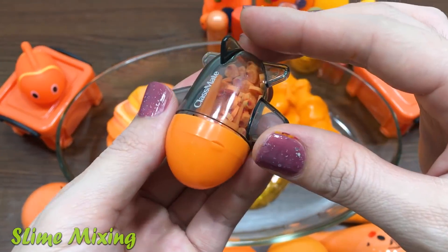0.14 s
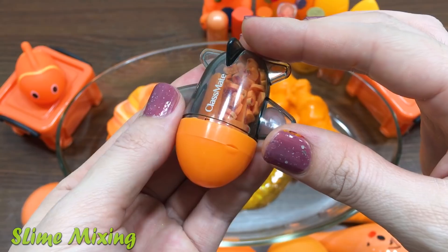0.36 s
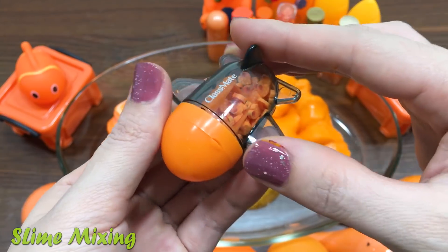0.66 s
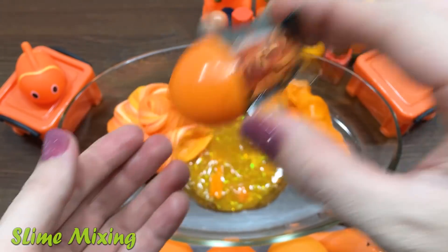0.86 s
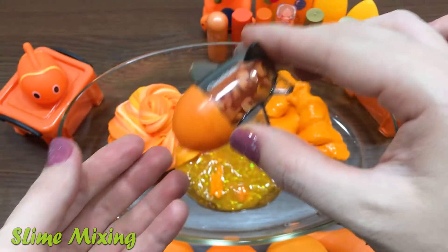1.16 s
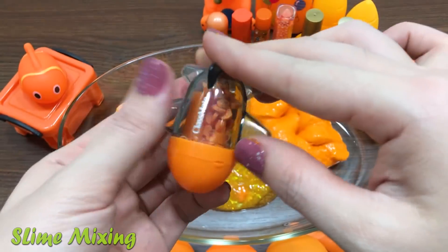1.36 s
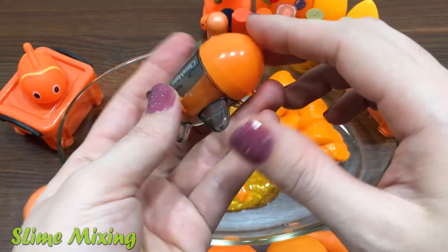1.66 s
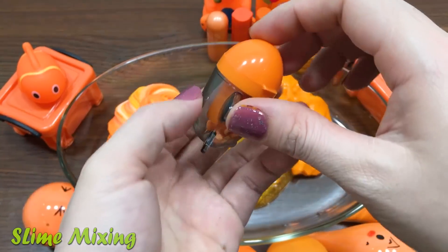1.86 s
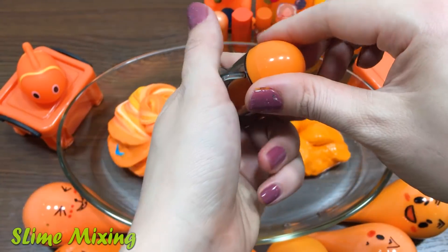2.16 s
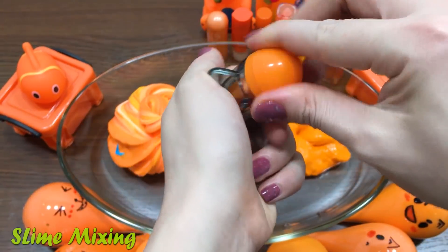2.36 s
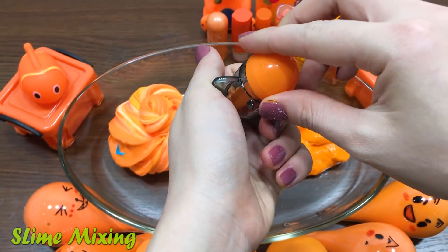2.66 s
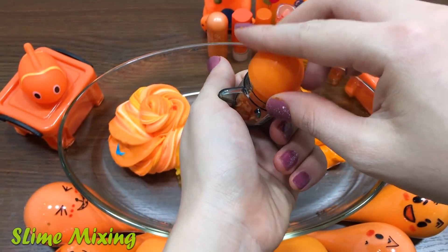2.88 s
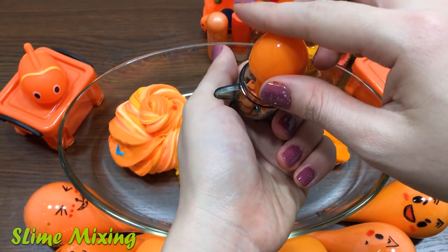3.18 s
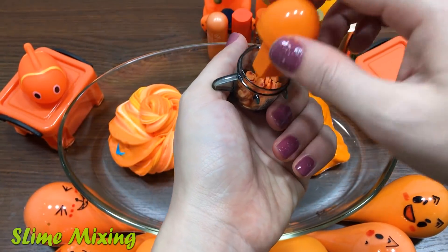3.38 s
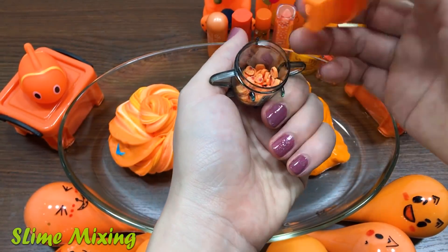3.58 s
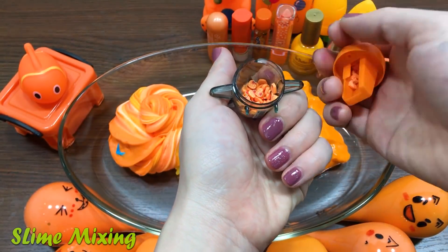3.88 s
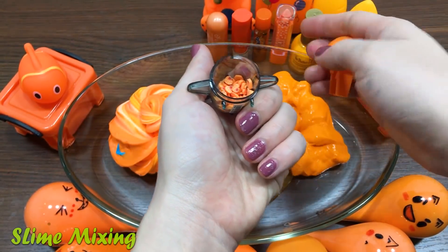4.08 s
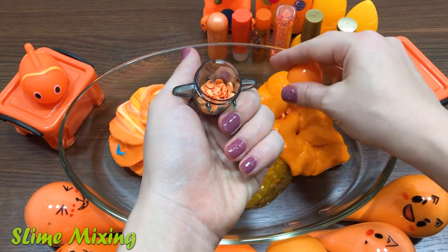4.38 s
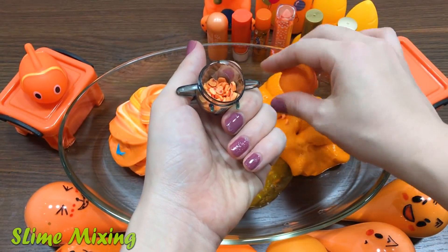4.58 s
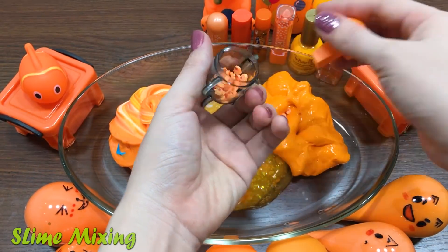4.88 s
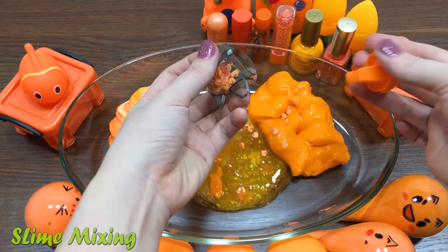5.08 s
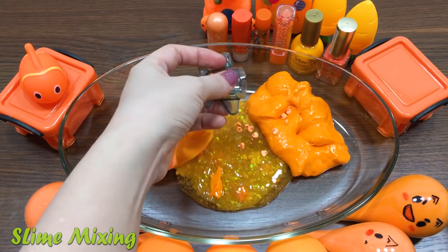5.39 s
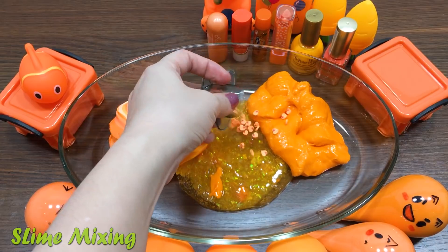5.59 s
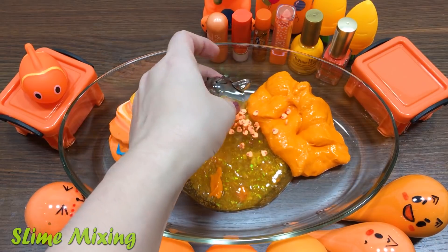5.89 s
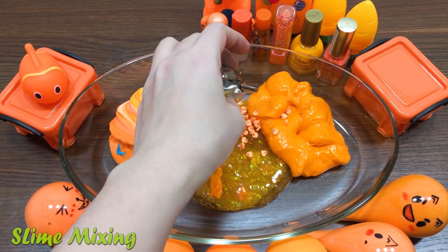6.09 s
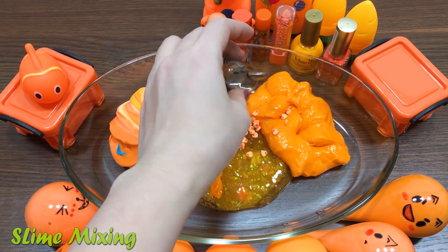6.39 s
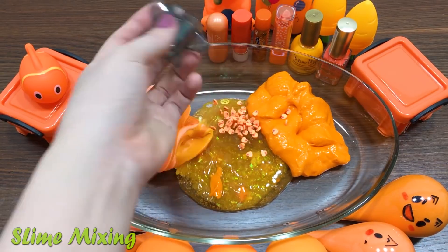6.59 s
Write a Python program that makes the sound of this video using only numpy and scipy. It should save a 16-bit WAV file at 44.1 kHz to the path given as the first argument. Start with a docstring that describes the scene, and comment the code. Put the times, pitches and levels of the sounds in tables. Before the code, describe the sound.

Very close in a quiet room, fingers faintly rub a small plastic capsule, then shake it in four quick, bright bursts of rattling pieces. Nails click on the shell, the cap pops off with a sharp snap, and hollow knocks ring the open cup. The loose cap clicks lightly in the fingers and is put down. Finally, tiny pieces slide out in sparse, faint ticks, landing silently.

```python
"""Shaking and opening a small toy capsule

Close up in a quiet room, a plastic capsule is shaken four times: swarms of contacts ring its shell as pieces rattle.
Fingers rub and click on it; the cap snaps off, and short noisy forces ring the cup and then the loose cap.
The pieces slide out of the cup in sparse clicks and flurries, onto soft slime that adds no sound.
Soft bumps are damped sines; a brief dull noise band, a noise-band tail, filtered air, hum and a thin whine complete it."""
import sys
import numpy as np
from scipy import signal
from scipy.fft import rfft, irfft
from scipy.io import wavfile

SR = 44100
rng = np.random.default_rng(int(sys.argv[2]) if len(sys.argv) > 2 else 0)


def store_pcm(level_fs):
    """Save levels as 16-bit WAV."""
    pcm = np.round(np.clip(level_fs, -1, 1) * 32767).astype(np.int16)
    wavfile.write(sys.argv[1], SR, np.atleast_2d(pcm).T)


N = 297353
TIME = np.arange(N) / SR
CUTOFF_HZ = 15800

# resonances of the closed capsule: (frequency [Hz], width [Hz], level [dB])
SHELL_MODES = [(1800, 170, -15), (2570, 340, -7.5), (3100, 550, -14.5), (4580, 850, -4), (5640, 780, -6.5),
               (7040, 830, -2), (8500, 470, -3.5), (9190, 410, -1.5), (10880, 1300, -4), (12140, 1200, -2),
               (14550, 1400, -3.5), (15700, 700, -1)]


def from_db(db):
    """Decibels to gain."""
    return 10 ** (np.asarray(db) / 20)


def rms_one(x):
    """Scale to rms 1."""
    return x / np.sqrt(np.mean(x ** 2) + 1e-20)


def add(out, s, sound):
    """Mix a short sound in at time s."""
    at = round(s * SR)
    sound, at = sound[max(-at, 0):], max(at, 0)
    out[at:at + len(sound)] += sound[:N - at]


def cut(x, hz, kind, order=2):
    """Butterworth filter."""
    sos = signal.butter(order, np.clip(hz, 10, .48 * SR), kind, fs=SR, output="sos")
    return signal.sosfilt(sos, x)


def two_poles(hz, width_hz):
    """Pole radius and denominator of a damped mode."""
    r = np.exp(-np.pi * width_hz / SR)
    return r, [1, -2 * r * np.cos(2 * np.pi * hz / SR), r * r]


def resonance(x, hz, width_hz):
    """Two-pole resonance with gain 1 on top."""
    r, poles = two_poles(hz, width_hz)
    zeros = np.array([1, 0, -1]) * (1 - r * r) / 2
    return signal.lfilter(zeros, poles, x + 1e-18)


def disperse(x, hz=6000, width_hz=5000, count=1):
    """Bending waves reach the edge of a thin wall at different times: an all-pass smears a sharp front."""
    _, poles = two_poles(hz, width_hz)
    for _ in range(count):
        x = signal.lfilter(poles[::-1], poles, x)
    return x


def swell_at(at_s, spread_s):
    """A slow bell-shaped rise and fall, 0 to 1."""
    return np.exp(-((TIME - at_s) / spread_s) ** 2 / 2)


def hollow(x, s, width_hz):
    """The air resonance of the hollow at time s, higher the less the cap and the fingers cover it."""
    # air resonance: (time [s], frequency [Hz])
    hollow_pitch = [(1.5, 2700), (1.9, 4200), (2.25, 4100), (2.367, 2130), (2.556, 3740), (2.6, 2400),
                    (2.72, 2400), (2.97, 3080), (3.15, 2550), (3.26, 2990), (3.7, 3050), (3.86, 4400),
                    (3.95, 3260), (5.2, 3770), (6.1, 2300)]
    return resonance(x, np.interp(s, *np.transpose(hollow_pitch)), width_hz)


def plastic(force, modes, spread_db):
    """A thin plastic wall: each place of contact drives its modes with other strengths."""
    strengths = from_db(rng.normal(0, spread_db, len(modes)))
    ring = 0
    for k, (hz, width_hz, db) in enumerate(modes):
        gain = (-1) ** k * strengths[k] * from_db(db)
        ring = ring + gain * resonance(force, hz, width_hz)
    return ring


def at_click_level(x, db):
    """Give a click the energy of 4 ms at this level."""
    return x * from_db(db) * np.sqrt(.004 * SR / (np.sum(x ** 2) + 1e-20))


def clicks(rows, modes, tick_hz, rough, slip_s, crack_db, hollow_db, hollow_width_hz,
           octaves_per_db=.018, colour_db=1.5, firm_db=-40, skid_power=.34):
    """A sharp release and a skid, longer for firm knocks: the hollow body rings low, the wall ticks high."""
    split_hz = 4500
    out, t = np.zeros(N), TIME[:SR // 40]
    for s, body_db, tick_db in rows:
        skid_s = slip_s * from_db(skid_power * (max(body_db, tick_db) - firm_db))
        skid = rough * rng.standard_normal(len(t)) * np.exp(-t / skid_s)
        force = cut(skid, 4200, "high")
        force[0] += 1  # release

        crack = from_db(crack_db) * cut(force, 900, "high", order=1)
        ring = plastic(force, modes, colour_db) + crack

        low = cut(ring, split_hz, "low", order=4)
        body = hollow(low, s, 3900) + from_db(hollow_db) * hollow(low, s, hollow_width_hz)

        # the more the tick outweighs the body, the higher it lies
        centre_hz = min(tick_hz * 2 ** (octaves_per_db * (tick_db - body_db)), CUTOFF_HZ)
        tick = resonance(cut(ring, split_hz, "high", order=4), centre_hz, 5400)

        add(out, s, disperse(at_click_level(body, body_db) + at_click_level(tick, tick_db)))
    return out


def fidget(from_s, to_s, per_s, body_db, tick_db, spread_db=2.5):
    """Faint contacts at loosely spaced moments: rows of (time [s], body [dB], tick [dB])."""
    count = max(round((to_s - from_s) * per_s), 1)
    times = from_s + (to_s - from_s) * (np.arange(count) + rng.random(count)) / count
    return [(s, *rng.normal([body_db, tick_db], spread_db)) for s in times]


def flurries(rows, modes, per_s, uneven_db, crack_db, hollow_db, bright_hz, edge, count=6):
    """Swarms of tiny uneven contacts swell and fade around a moment; each place has its own colour."""
    out = np.zeros(N)
    for s, db, spread_s in rows:
        reach = int(SR * min(4 * spread_s + .01, .3))
        t = np.arange(-reach, reach) / SR
        swell = np.exp(-np.abs(t / spread_s) ** edge / 2)
        sound = 0
        for _ in range(count):  # places of contact
            sizes = from_db(uneven_db * np.minimum(rng.exponential(1, len(t)), 3))
            sizes = sizes * rng.choice([-1, 1], len(t))
            struck = rng.random(len(t)) < per_s / count / SR
            force = sizes * struck * swell
            crack = from_db(crack_db) * cut(force, 1100, "high", order=1)
            grains = plastic(force, modes, spread_db=3.0) + crack
            sound = sound + cut(grains, bright_hz * 2 ** rng.normal(0, .288), "low")
        sound = sound + from_db(hollow_db) * hollow(sound, s, 700)
        sound = from_db(db) * rms_one(sound) * np.sqrt(np.mean(swell ** 2))
        add(out, s + t[0], sound)
    return out


def background():
    """Still air as shaped noise with a swelling rumble; narrow noise bands hum and a sine whines."""
    # still air, spectrum shape: (frequency [Hz], relative level per Hz [dB])
    air_shape = [(15, -55.5), (25, -25), (50, -6.5), (127, -5), (141, -3.5), (157, -15), (185, -9),
                 (309, -15), (624, -22), (796, -23), (887, -25.5), (2160, -29.5), (6210, -33.5),
                 (7920, -32.5), (16000, -38.5)]
    # distant appliance: (frequency [Hz], level relative to the hum [dB])
    hum_lines = [(130.2, -4), (69.8, -6)]
    air_db, hum_db, whine_db = -65, -70.5, -85.5
    whine_hz, waver_hz, rumble_hz = 786, 6.3, 130

    hz, db = np.transpose(air_shape)
    bins_hz = np.maximum(np.fft.rfftfreq(N, 1 / SR), 1)
    shape = from_db(np.interp(np.log(bins_hz), np.log(hz), db))
    air = rms_one(irfft(rfft(rng.standard_normal(N)) * shape, N))
    rumble_db = -3.5 + 6 * swell_at(3.9, spread_s=.8)  # relative to still air
    air = air + cut(air, rumble_hz, "low", order=1) * (from_db(rumble_db) - 1)

    hum = 0
    for line_hz, line_db in hum_lines:
        line = resonance(rng.standard_normal(N + SR), line_hz, waver_hz)[SR:]  # drop the onset
        hum = hum + from_db(line_db) * rms_one(line)
    hum = hum * from_db(hum_db + 8 * swell_at(5.6, spread_s=.45))

    whine = from_db(whine_db) * np.sqrt(2) * np.sin(2 * np.pi * whine_hz * TIME)
    return cut(from_db(air_db) * air + hum + whine, 43, "high", order=3)


def closed_capsule():
    """Fingers rub the closed shell; nails and single pieces click on it and ring its modes."""
    # finger rubs: (time [s], level [dB], spread [s])
    shell_rubs = [(.05, -68.5, 0.05), (.28, -70, 0.016), (.75, -75, 0.05), (1.54, -59.5, 0.04),
                  (1.872, -51, 0.012), (1.95, -60.5, 0.045), (2.22, -55, 0.02), (2.28, -56.5, 0.018)]
    # nails and single pieces: (time [s], body [dB], tick [dB])
    shell_clicks = [(0.2782, -59, -58), (0.7636, -67, -68), (0.8931, -67.5, -66), (1.0356, -62, -58),
                    (1.0539, -62, -37), (1.0685, -52, -32.5), (1.169, -44, -32), (1.4315, -63, -44),
                    (1.4777, -49, -42), (1.7098, -58.5, -51.5), (1.7205, -55, -49), (1.8311, -65, -49),
                    (1.8448, -66, -46.5), (1.8701, -46.5, -38), (1.9037, -68, -48), (1.9882, -57, -50),
                    (2.0439, -53.5, -40.5), (2.102, -66, -49.5), (2.2044, -53, -45), (2.2401, -52, -43.5),
                    (2.2726, -58, -55)]
    stray = fidget(2.14, 2.34, per_s=25, body_db=-62, tick_db=-59)
    rubbing = flurries(shell_rubs, SHELL_MODES, per_s=600, uneven_db=5.0, crack_db=-12,
                       hollow_db=-11, bright_hz=12000, edge=1.6)
    clicking = clicks(shell_clicks + stray, SHELL_MODES, tick_hz=7900, rough=.15, slip_s=.0016,
                      crack_db=-17, hollow_db=-21, hollow_width_hz=1500)
    return rubbing + clicking


def shaking():
    """Pieces brush the near wall, then land on the far one, where one hits hardest and rebounds."""
    # strokes as the heap lands, the last only settling it: (time [s], level [dB])
    strokes = [(1.091, -30.7), (1.201, -30.7), (1.2935, -30.3), (1.3805, -32.3), (1.463, -44)]
    brush_lead_s, rebound_s = .029, .0115
    brushes = [(s - brush_lead_s, db - 5.5, .0082) for s, db in strokes]
    landings = [(s, db, .0068) for s, db in strokes]
    rattle = flurries(brushes + landings, SHELL_MODES, per_s=2200, uneven_db=2.0, crack_db=-14,
                      hollow_db=-14, bright_hz=17900, edge=2.6)

    hits = strokes + [(s + rebound_s, db - 12) for s, db in strokes]
    hardest = [(s, db - 12.5, db + 5.5) for s, db in hits]  # body, tick
    return rattle + clicks(hardest, SHELL_MODES, tick_hz=7900, rough=.1, slip_s=.001,
                           crack_db=-15, hollow_db=-21, hollow_width_hz=1500)


def low_mid_noise(level_db=-65, low_hz=180, high_hz=450):
    """A dull low-mid noise band fades in, holds and fades out, from 1.2 to 1.63 s."""
    band = cut(cut(rng.standard_normal(N), low_hz, "high"), high_hz, "low")
    fade = np.interp(TIME, [1.195, 1.25, 1.6, 1.63], [0, 1, 1, 0])
    return from_db(level_db) * rms_one(band) * fade


def open_cup():
    """Knocks ring the cup and its air; its rim grazes the cap or a finger in flurries."""
    # resonances of the cup: (frequency [Hz], width [Hz], level [dB])
    cup_modes = [(1350, 640, -7), (2086, 250, 3.5), (2400, 430, -1), (3074, 225, 0.5), (4070, 300, -10),
                 (5150, 1000, 0), (8150, 880, -12.5), (8050, 570, -17), (12100, 200, -7),
                 (12000, 1100, -22), (14450, 520, -12)]
    # knocks: (time [s], body [dB], tick [dB])
    cup_clicks = [(2.3671, -50, -54), (2.518, -54, -69), (2.6181, -34, -53), (2.6492, -31.5, -40),
                  (2.6724, -51, -37.5), (2.8983, -51, -63), (2.9713, -38, -40), (3.0169, -48.5, -62),
                  (3.0285, -46.5, -51), (3.1458, -42, -53), (3.2549, -33, -41.5), (3.2829, -42, -58),
                  (3.3636, -50.5, -54.5), (3.5055, -45.5, -53)]
    # rim grazes: (time [s], level [dB], spread [s])
    rim_rubs = [(2.551, -45.5, 0.0059), (2.562, -40, 0.0032), (2.708, -47.5, 0.0065), (2.93, -57.5, 0.013),
                (3.156, -53, 0.003), (3.21, -65, 0.025), (3.42, -59.5, 0.007), (6.11, -66, 0.033)]
    stray = fidget(2.68, 2.77, per_s=30, body_db=-52, tick_db=-58)
    knocks = clicks(cup_clicks + stray, cup_modes, tick_hz=9000, octaves_per_db=.015, rough=.46,
                    slip_s=.001, crack_db=-10.5, hollow_db=8.5, hollow_width_hz=530)
    grazes = flurries(rim_rubs, cup_modes, per_s=1300, uneven_db=6.5, crack_db=-9.5,
                      hollow_db=1.5, bright_hz=13000, edge=1.2)
    return knocks + grazes


def bumps():
    """Plastic gives way or touches down: a few cycles of a low, heavily damped mode."""
    # dull bumps: (time [s], amplitude before decay [dB], frequency [Hz], t60 [s])
    dull_bumps = [(2.542, -32.5, 1010, 0.005), (2.5425, -41.5, 340, 0.028), (2.555, -31.5, 1140, 0.015),
                  (2.5555, -40, 410, 0.0144), (4.478, -43, 720, 0.013)]
    out, t = np.zeros(N), TIME[:SR // 10]
    for s, db, hz, t60_s in dull_bumps:
        decay = np.exp(-np.log(1000) * t / t60_s)
        add(out, s, from_db(db) * np.sin(2 * np.pi * hz * t) * decay)
    return out


def cap_snap():
    """The cap's rim jumps over its catch and rebounds, ringing the capsule as it springs apart."""
    # resonances while springing apart: (frequency [Hz], width [Hz], level [dB])
    seam_modes = [(1150, 240, -11), (2220, 670, -0.5), (3260, 870, -9.5), (4150, 340, 3.5),
                  (5770, 1000, -4), (8300, 1500, -4), (11900, 1600, -8.5), (15200, 2500, -0.5)]
    # jump and rebounds: (time [s], body [dB], tick [dB])
    snap_clicks = [(2.5528, -38.5, -57), (2.5546, -24, -33.5), (2.5564, -44, -25), (2.5599, -41.5, -34)]
    return clicks(snap_clicks, seam_modes, tick_hz=6700, octaves_per_db=.035, rough=.22,
                  slip_s=.00045, crack_db=-17.5, hollow_db=-14.5, hollow_width_hz=1300)


def loose_cap():
    """The cap, turned in the fingers and put aside, rings with clicks and finger rubs."""
    # resonances of the cap: (frequency [Hz], width [Hz], level [dB])
    cap_modes = [(2100, 650, -21), (2810, 170, 2.5), (3110, 190, -2.5), (3450, 160, 2), (4020, 360, -1),
                 (4440, 400, 0), (5230, 740, -8), (7000, 960, -3.5), (8600, 810, -31), (10270, 330, -2),
                 (11600, 1200, -17), (14700, 1100, -12)]
    # contacts: (time [s], body [dB], tick [dB])
    cap_clicks = [(3.7077, -53, -53), (3.754, -54.5, -54), (3.7742, -56.5, -54.5), (3.8519, -47, -54),
                  (3.8578, -46, -50), (3.8874, -49, -50), (3.8965, -42, -45), (3.9044, -44, -46),
                  (3.9162, -50, -47), (3.9445, -47, -57), (3.9897, -68, -55), (4.1332, -52.5, -53),
                  (4.1687, -57, -59), (4.2854, -49, -49.5), (4.3487, -48.5, -46.5), (4.4118, -50.5, -53),
                  (4.4425, -51.5, -60), (4.4582, -63, -48.5), (4.4871, -51, -40), (4.4892, -37, -45),
                  (4.4932, -40.5, -54), (4.6327, -50, -47), (4.719, -58.5, -64), (4.8131, -58, -63)]
    # finger rubs: (time [s], level [dB], spread [s])
    cap_rubs = [(3.70, -58, 0.0061), (3.915, -61, 0.03), (4.28, -62.5, 0.018), (4.45, -58, 0.03),
                (4.52, -52.5, 0.018), (4.60, -58.5, 0.051), (4.82, -62, 0.028)]
    stray = fidget(3.808, 3.848, per_s=75, body_db=-55.5, tick_db=-59)
    clicking = clicks(cap_clicks + stray, cap_modes, tick_hz=7600, octaves_per_db=.04, rough=.15,
                      slip_s=.0011, crack_db=-9.5, hollow_db=-3, hollow_width_hz=700)
    rubbing = flurries(cap_rubs, cap_modes, per_s=380, uneven_db=.5, crack_db=-10.5,
                       hollow_db=-6, bright_hz=12200, edge=1.15)
    return clicking + rubbing


def pouring():
    """Pieces hit the wall of the tilted cup and slide out in sparse flurries."""
    # resonances: (frequency [Hz], width [Hz], level [dB])
    piece_modes = [(2020, 1400, -15.5), (2620, 120, -0.5), (3140, 220, -9.5), (5700, 320, 3.5),
                   (6900, 700, -6), (8200, 1060, 0.5), (10300, 360, -15), (10860, 470, -2.5),
                   (11930, 280, 0.5), (12900, 300, 5), (14100, 570, -7)]
    # wall hits: (time [s], body [dB], tick [dB])
    piece_clicks = [(5.197, -57.5, -73), (5.2073, -59.5, -66), (5.2493, -60, -73), (5.3175, -57.5, -60),
                    (5.3893, -66, -56.5), (5.4373, -53.5, -75), (5.5232, -60, -45), (5.5839, -67, -47.5),
                    (5.6271, -53.5, -42), (5.6861, -61, -47), (5.7523, -57.5, -49), (5.8012, -70, -51),
                    (5.8427, -60.5, -39.5), (6.0934, -70, -53)]
    # slides: (time [s], level [dB], spread [s])
    piece_slides = [(5.22, -66, 0.025), (5.56, -65, 0.05), (5.685, -59.5, 0.035), (5.85, -62, 0.045),
                    (6.10, -60, 0.032)]
    stray = fidget(5.55, 5.9, per_s=14, body_db=-64, tick_db=-59)
    hits = clicks(piece_clicks + stray, piece_modes, tick_hz=7900, colour_db=2.2, rough=.76,
                  slip_s=.0021, crack_db=-9, hollow_db=6, hollow_width_hz=750)
    sliding = flurries(piece_slides, piece_modes, per_s=200, uneven_db=1.5, crack_db=-6.5,
                       hollow_db=-10, bright_hz=13900, edge=1.27)
    return hits + sliding


def room(x, build_s=.002, first_echo_s=.001):
    """A diffuse tail builds up after the first echo and dies band by band."""
    # tail: (frequency [Hz], gain on band noise [dB], t60 [s])
    room_tail = [(286, -9.5, 1), (1200, -8, .65), (2390, -7.5, 0.65), (4820, -11.5, 0.61),
                 (8600, -11, 0.53), (14950, -12.5, 0.43)]
    room_hz, room_db, room_t60_s = np.transpose(room_tail)
    t, response = TIME[:SR], 0
    build = 1 - np.exp(-np.maximum(t - first_echo_s, 0) / build_s)
    edges_hz = np.geomspace(150, 18000, 11)
    for low_hz, high_hz in zip(edges_hz, edges_hz[1:]):
        log_centre = np.log(low_hz * high_hz) / 2
        db = np.interp(log_centre, np.log(room_hz), room_db)
        t60_s = np.interp(log_centre, np.log(room_hz), room_t60_s)
        decay = build * np.exp(-np.log(1000) * t / t60_s)
        noise = cut(rng.standard_normal(SR), [low_hz, high_hz], "band")
        response = response + from_db(db) * noise * decay / np.sqrt(np.sum(decay ** 2))
    return signal.fftconvolve(x, response)[:N]


def scene():
    """The closed capsule, its opening, the loose cap and the pouring, all in one room."""
    air = background()
    closed = closed_capsule() + shaking()
    dull_band = low_mid_noise()
    opening = open_cup() + bumps() + cap_snap()
    direct = closed + opening + loose_cap() + pouring()
    return (direct + room(direct) + dull_band + air)[None]


def record(dry):
    """Round the highest peaks with tanh and cut the top steeply."""
    top = .3
    steep = signal.ellip(10, .2, 70, CUTOFF_HZ, fs=SR, output="sos")
    return signal.sosfilt(steep, top * np.tanh(dry / top))


dry = scene()
out = record(dry)
store_pcm(out)
```